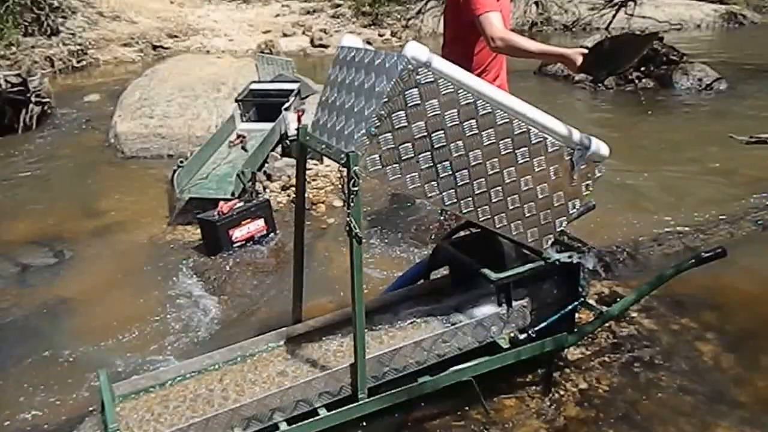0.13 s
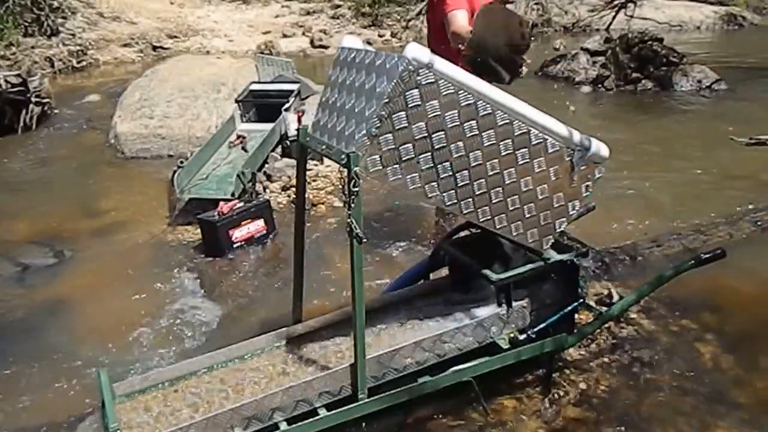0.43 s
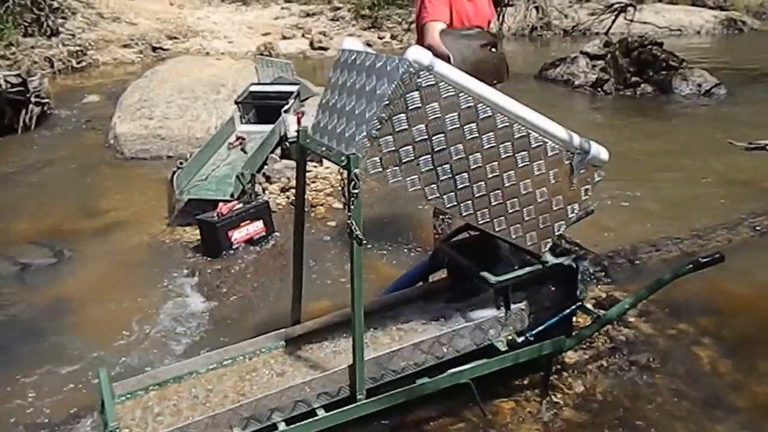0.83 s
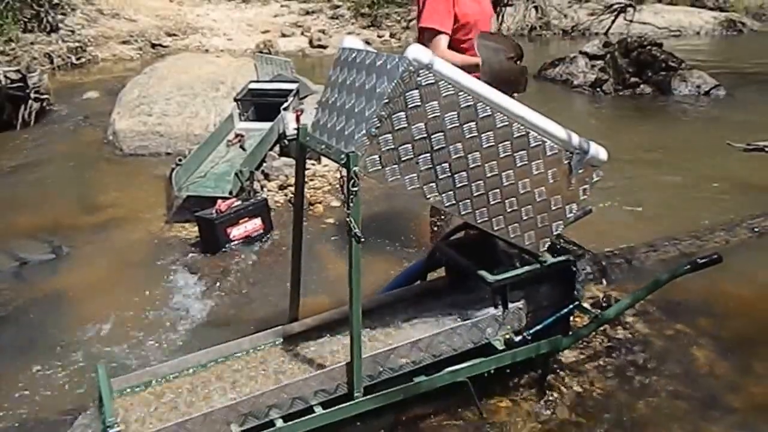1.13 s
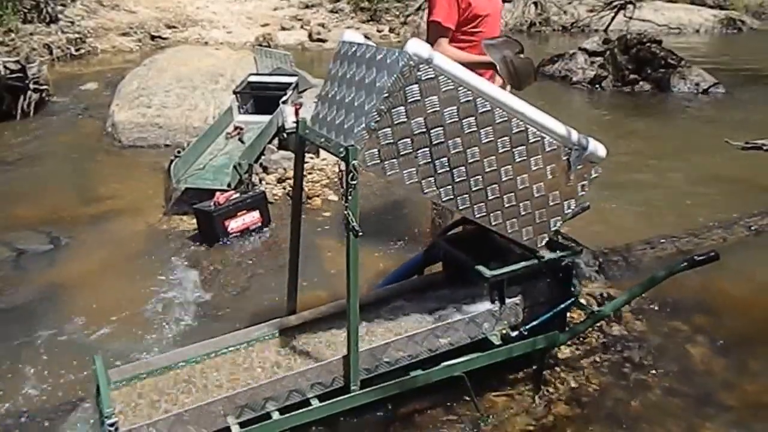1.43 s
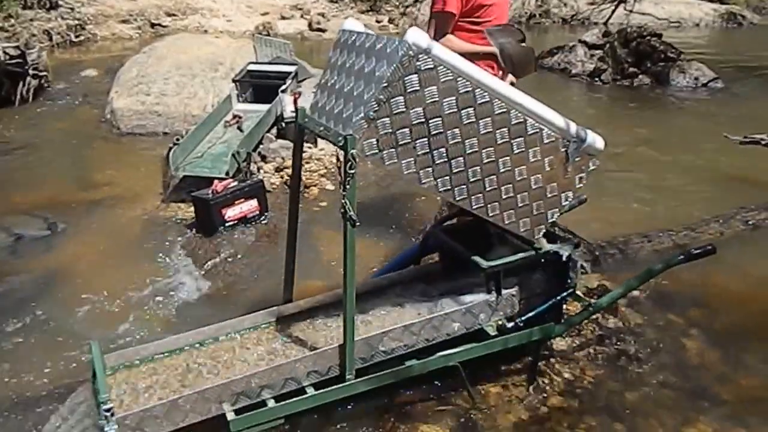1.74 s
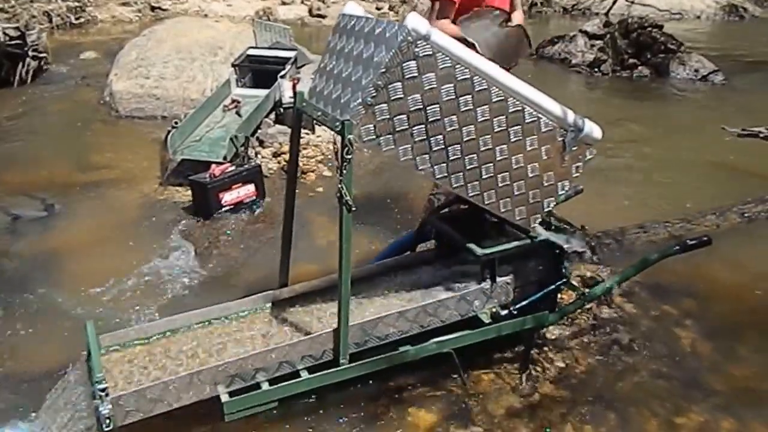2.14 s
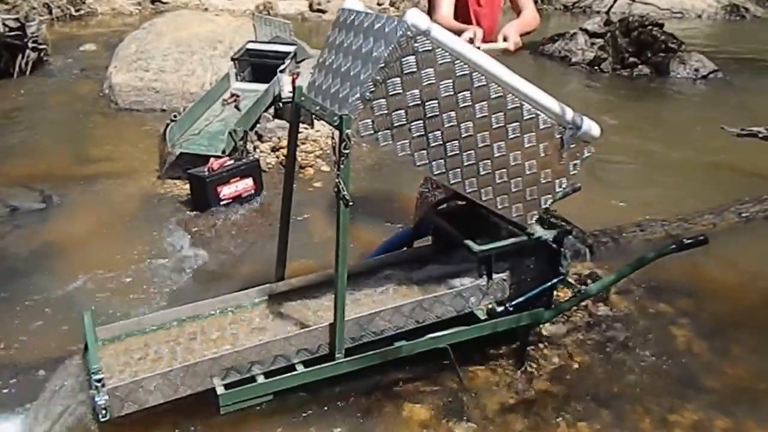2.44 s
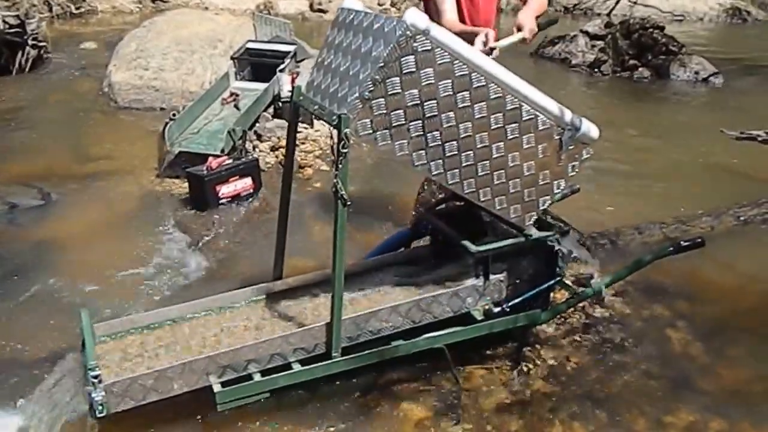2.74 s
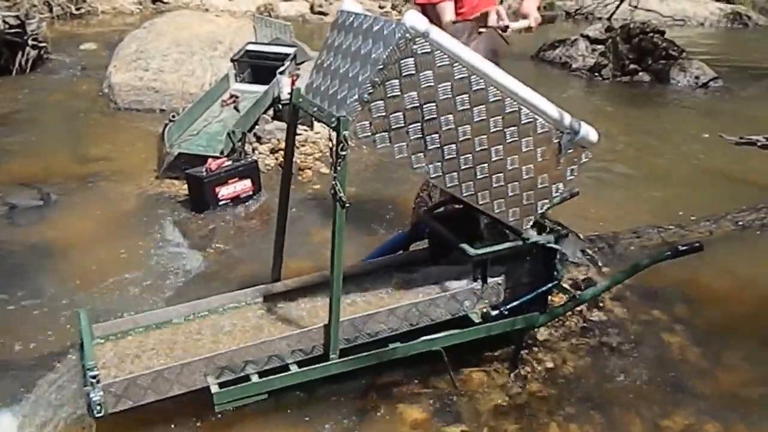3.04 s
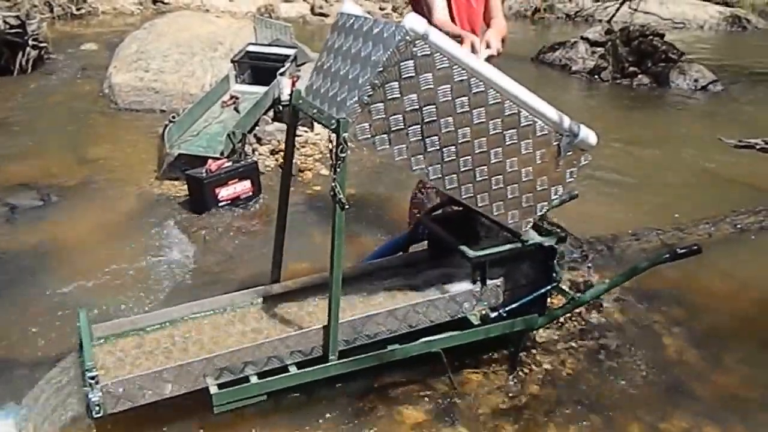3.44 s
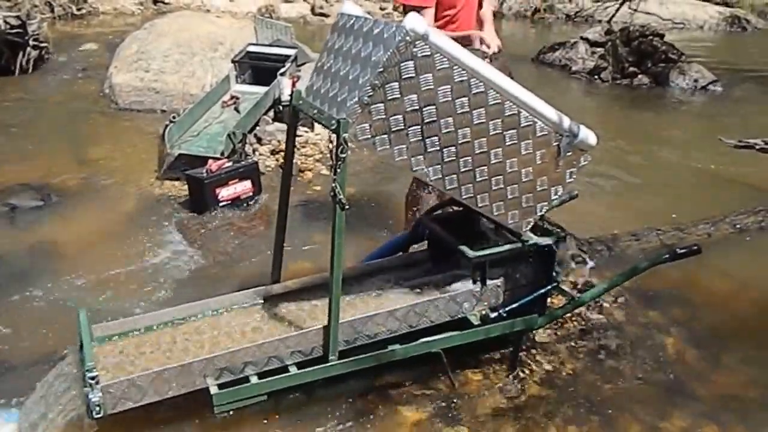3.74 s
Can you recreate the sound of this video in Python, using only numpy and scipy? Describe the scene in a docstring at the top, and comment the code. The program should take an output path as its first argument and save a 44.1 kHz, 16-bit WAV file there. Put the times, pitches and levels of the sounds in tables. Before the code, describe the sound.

Wet gravel tumbles and clatters into a metal hopper over steady rushing, bubbling water

```python
"""Wet gravel is tipped and shovelled into the metal hopper of a sluice standing in a river.
Gravel slides as a dense stream of noise grains and ringing pebbles, and drops in swelling clumps.
Single stones knock on the plate or clink together, the shovel blade scrapes and rings, water plops and gurgles.
Water rushes (coloured grains) and bubbles (decaying sines) throughout, over a pump's faint hum of three sines."""
import sys
import numpy as np
from scipy import signal
from scipy.fft import rfft, irfft, next_fast_len
from scipy.io import wavfile
from scipy.ndimage import map_coordinates

SR = 44100
rng = np.random.default_rng(int(sys.argv[2]) if len(sys.argv) > 2 else 0)


def wav_record(signal):
    """Record a signal, one row per channel, as 16-bit PCM in the file named by sys.argv[1]."""
    frames = np.transpose(np.atleast_2d(signal))
    bounded = np.clip(frames, -1, 1)
    # unit amplitude maps onto the largest positive 16-bit level
    quanta = np.round(bounded * 32767).astype(np.int16)
    wavfile.write(sys.argv[1], SR, quanta)


N = 171549  # samples

# Colour of gravel on the hopper plate. Each row: frequency in Hz, relative level in dB.
HOPPER_COLOUR = [(40, -31.5), (140, -12), (178, -33), (201, -11.5), (268, 2), (303, -7), (341, -1),
                 (489, -3), (565, -10.5), (718, 1), (957, -3), (1310, -9), (1510, -2.5), (1830, -3.5),
                 (2060, -6), (3030, -6.5), (3420, -13.5), (7190, -18.5), (8710, -13.5), (15500, -48)]
# Colour of fine wet spray and of stone cracks. Each row: frequency in Hz, relative level in dB.
SPRAY_COLOUR = [(1200, -26.5), (3000, -3.5), (5000, -1.5), (8900, -0.5), (11000, -6.5), (15500, -14)]


def amp(db):
    """Decibels to gain."""
    return 10 ** (np.asarray(db) / 20)


def unit(x):
    """Scale to rms 1."""
    return x / np.sqrt(np.mean(x ** 2) + 1e-20)


def along(points, hz):
    """Read (Hz, value) points at the frequencies hz, on a log axis."""
    f, v = np.transpose(points)
    return np.interp(np.log(hz + 1), np.log(f + 1), v)


def wobble(rate):
    """A smooth random curve with this many knots a second."""
    return map_coordinates(rng.standard_normal(4096), [np.arange(N) * rate / SR], mode="mirror")


def filtered(x, response):
    """Multiply the spectrum of x by a response of frequency."""
    m = next_fast_len(N + SR // 2)
    return irfft(rfft(x, m) * response(np.fft.rfftfreq(m, 1 / SR)), m)[..., :N]


def ring_of(spectrum, size=2048):
    """Causal (minimum-phase) impulse response with the given colour, by folding its cepstrum."""
    hz = np.fft.rfftfreq(size, 1 / SR)
    cepstrum = irfft(np.log(amp(along(spectrum, hz))))
    cepstrum[1:size // 2] *= 2
    cepstrum[size // 2 + 1:] = 0
    return irfft(np.exp(rfft(cepstrum)))


def coloured(pair, spectrum):
    """A pair of signals rung through a colour."""
    return signal.fftconvolve(pair, ring_of(spectrum)[None], axes=1)[:, :N]


def spread(pair):
    """Two signals, mid and side, become left and right with a likeness set by frequency."""
    # How alike the two channels are. Each row: frequency in Hz, left-right correlation (1 is identical).
    likeness = [(30, 0.27), (125, 0.7), (300, 0.96), (1800, 0.94), (4000, 0.73), (13000, 0.47)]
    turn = lambda hz: np.arccos(np.clip(along(likeness, hz), -1, 1)) / 2
    mid, side = filtered(pair, lambda hz: np.array([np.cos(turn(hz)), np.sin(turn(hz))]))
    return np.array([mid + side, mid - side])


def add(out, s, sound):
    """Mix a sound in at s seconds."""
    part = out[..., max(0, round(s * SR)):][..., :sound.shape[-1]]
    part += sound[..., :part.shape[-1]]


def grains(per_s, scatter_db, life_s, sand):
    """Many tiny contacts of scattered size, each a short burst of noise, over smooth sand."""
    scatter = np.clip(rng.standard_normal(N), -2, 2)
    sizes = (rng.random(N) < per_s / SR) * amp(scatter_db * scatter)
    power = signal.lfilter([1], [1, -np.exp(-2 / (life_s * SR))], sizes ** 2)
    return np.sqrt(power / power.mean() + abs(sand)) * rng.standard_normal((2, N))


def bubbles(per_s=260, centre_hz=929, cycles=7.2, rise=0.15):
    """Each bubble is a decaying sine whose pitch climbs while it is loud."""
    out, t = np.zeros((2, N)), np.arange(SR // 20) / SR
    for when, pitch, size, side in rng.random((int(per_s * N / SR), 4)):
        hz = centre_hz * 2 ** (3.2 * (pitch - .5))  # over 3.2 octaves
        age = t * hz / cycles
        phase = 2 * np.pi * hz * t * (1 + rise * np.minimum(age, 2) / 2)
        # loses 22 dB in the given number of cycles
        ring = np.sin(phase) * amp(-22 * age) * (1 - np.exp(-t * hz))
        place = [1, 3 * (side - .5)]  # mid and side
        add(out, when * N / SR, amp(18.0 * size ** 2) * np.outer(place, ring))
    return out


def water(rush_db=-29, bubble_db=-38.5):
    """The rush down the sluice: churning splashes as coloured grains of wandering level, with bubbles."""
    # Colour of the rush. Each row: frequency in Hz, relative level in dB.
    rush_colour = [(30, -37), (71, -22), (208, -0.5), (399, 0.5), (606, -8), (897, 3.5), (1050, -1),
                   (1400, -7.5), (1720, 0.5), (2020, -5), (2490, -3), (3590, -12.5), (7460, -17),
                   (15500, -21.5)]
    splashes = grains(per_s=900, scatter_db=10.5, life_s=0.0042, sand=1.8)
    rush = unit(coloured(splashes, rush_colour))
    return amp(rush_db + 2.45 * wobble(7.3)) * rush + amp(bubble_db) * unit(bubbles())


def pump():
    """A faint hum under the water: sines that waver together in pitch and separately in level."""
    # Tones of the hum. Each row: pitch in Hz, level in dB, both before wavering.
    tones = [(141, -56), (282, -51.5), (344, -47)]
    speed = 1 + 0.0154 * wobble(12)
    turns = np.cumsum(speed) / SR
    return sum(amp(db + 1.15 * wobble(6.9)) * unit(np.sin(2 * np.pi * hz * turns)) for hz, db in tones)


def rattling(bed, pebbles_per_s=620, t60_at_1khz=.016, scatter_db=2, pebble_db=-4):
    """Over a bed of grains, pebbles ring at their own pitch and place; the higher, the shorter."""
    draws = rng.random((int(pebbles_per_s * N / SR), 4))
    when, pitch, side, size = draws.T[:, :, None]
    hz, t = 250 * 48 ** pitch, np.arange(SR // 60) / SR  # 250 Hz to 12 kHz
    t60 = t60_at_1khz * np.sqrt(1000 / hz)
    strength = np.sqrt(hz / t60) * amp(-scatter_db * np.log(size + 0.035))
    rings = strength * np.sin(2 * np.pi * hz * t) * amp(-60 * t / t60) * (1 - np.exp(-t * hz))
    # sum all the rings at their own samples, once for mid and once for side
    at = ((when * N).astype(int) + np.arange(len(t))).ravel()
    pair = np.array([unit(np.bincount(at, (rings * g).ravel(), N)[:N]) for g in (1, side - .5)])
    return coloured(unit(bed) + amp(pebble_db) * pair, HOPPER_COLOUR)


def slide(dull_hz=4930, rattle_gain_db=0.5, spray_gain_db=0.5):
    """Gravel runs unevenly over the plate, its rattle muffled above dull_hz, with a fine wet spray."""
    # Course of the slide. Each row: time in seconds, rattle in dB, spray in dB, before gain and surging.
    course = [(.1, -31.5, -37), (.3, -28, -39), (.44, -21.5, -35.5), (.56, -27, -27), (.7, -28.5, -26.5),
              (.78, -32.5, -32), (1.15, -30.5, -30), (1.6, -21.5, -25.5), (1.93, -20.5, -24),
              (2.04, -23.5, -30.5), (2.23, -23.5, -27), (2.31, -30.5, -33.5), (2.46, -30.5, -31),
              (2.6, -21, -24.5), (2.66, -25.5, -29), (2.76, -16.5, -22), (2.885, -24, -29),
              (2.93, -21.5, -24.5), (3.39, -18, -23.5), (3.44, -27, -28.5), (3.5, -22, -26.5),
              (3.89, -23, -26.5)]
    s, *columns = np.transpose(course)
    surge_db = 1.03 * wobble(34.94)
    t = np.arange(N) / SR
    rattle, hiss = [amp(np.interp(t, s, db) + surge_db) for db in columns]
    pebbles = rattling(grains(per_s=380, scatter_db=2.0, life_s=0.007, sand=0.82))
    pebbles = unit(filtered(pebbles, lambda hz: 1 / np.hypot(1, (hz / dull_hz) ** 2)))
    spray = unit(coloured(grains(per_s=400, scatter_db=5.0, life_s=0.0083, sand=0.48), SPRAY_COLOUR))
    return amp(rattle_gain_db) * rattle * pebbles + amp(spray_gain_db) * hiss * spray


def clinks(rough=0.15, gain_db=-4, attack_s=0.00034):
    """Stone on stone rings for a few milliseconds, its phase jittered so that it sounds rough."""
    # Stones clinking together. Each row: start in seconds, level in dB before gain, pitch in Hz.
    strikes = [(.132, 1.5, 2680), (.581, -4, 1500), (.647, -5, 1850), (1.725, -7, 2700), (1.813, -8, 1620),
               (2.242, -9, 4100), (2.263, -7, 4380), (2.271, -3, 4580), (2.281, -5, 4280),
               (2.298, -15, 4400)]
    # Modes of a stone. Each row: ratio to the pitch, relative level in dB, 60 dB decay in seconds.
    modes = [(1, 1, 0.013), (1.15, 2.5, 0.0057), (1.38, -10, 0.01)]
    out, t = np.zeros(N), np.arange(SR // 20) / SR
    for s, db, hz in strikes:
        ring = np.zeros(len(t))
        for ratio, level, t60 in modes:
            jitter = rough * rng.standard_normal(len(t))
            phase = np.cumsum(2 * np.pi * hz * ratio / SR + jitter)
            ring += amp(level - 60 * t / t60) * np.sin(phase)
        add(out, s, amp(db + gain_db) * ring * (1 - np.exp(-t / attack_s)))
    return out


def knocks(body_t60=.03, crack_t60=0.021, crack_db=-11, gain_db=-2.0, brightening=0.53):
    """A stone gives a dead knock, a tick at its own pitches and a crack; hard contact favours the crack."""
    # Stones striking the plate. Each row: start in seconds, level in dB before gain,
    # brightness in steps (each shifts levels by "brightening" dB).
    strikes = [(0.187, -13.5, 23), (.482, -5, 17), (.581, -6, 2), (.602, -1.5, 0), (.624, -4, -4),
               (.637, -4, -3), (.648, -6, -8), (.694, -8, 12), (.734, -12, 20), (1.411, -6.5, -7),
               (1.494, -7, -3), (1.569, -4.5, 8), (1.609, -1.5, -7), (1.711, -9, -4), (1.725, -2.5, -9),
               (1.783, -0.5, -4), (1.813, -10, -3), (1.935, -5, 3), (1.957, -7, -8), (1.999, -1, -22),
               (2.384, -9.5, 15), (2.402, -7.5, 9), (2.6, -3, 9), (2.726, -7, -5), (2.798, -4, -5),
               (2.817, -7, -5), (3.607, -6.5, -7)]
    stone_hz, stone_octaves, stone_t60, stone_db = 2096, 1.6, 0.014, -9.5  # centre, spread, seconds, level
    out, t = np.zeros((2, N)), np.arange(SR // 16) / SR
    for (s, db, bright), pitches in zip(strikes, rng.random((len(strikes), 4))):
        body_db = -brightening * max(bright, 0)
        edge_db = crack_db + brightening * bright
        body = HOPPER_COLOUR, body_t60, body_db + gain_db
        crack = SPRAY_COLOUR, crack_t60, edge_db
        for colour, t60, part_db in (body, crack):
            burst = amp(-60 * t / t60) * rng.standard_normal((2, len(t)))
            hit = coloured(burst, colour)
            add(out, s, amp(db + part_db) * hit / np.abs(hit[0]).max())
        hz = stone_hz * 2 ** (stone_octaves * (pitches - .5))
        tick = np.sin(2 * np.pi * np.outer(hz, t)).sum(0) / 2
        add(out[0], s, amp(db + body_db + stone_db - 60 * t / stone_t60) * tick)  # mid only
    return out


def clumps():
    """Each clump swells and dies away: a thud of the plate, a rattle of pebbles and a spray."""
    # Clumps landing. Each row: time of the peak in seconds, rise and fall in seconds,
    # thud, rattle and spray in dB.
    landings = [(0.513, 0.006, 0.023, -22.5, -15, -26), (0.55, .004, 0.011, -19.5, -17, -35),
                (0.584, 0.0021, 0.04, -33, -14, -16), (0.615, 0.013, 0.073, -20.5, -15.5, -18),
                (1.348, 0.0046, 0.036, -29, -21, -25), (1.487, 0.014, 0.034, -26, -18, -26.5),
                (1.56, 0.021, 0.018, -22.5, -19.5, -24), (1.695, 0.009, .055, -25, -20, -30),
                (2.507, 0.013, 0.04, -14.5, -14, -19), (2.627, 0.006, 0.0085, -29, -14, -19),
                (2.728, .008, .016, -29, -16, -28), (2.797, 0.035, 0.043, -16, -13, -25),
                (2.845, 0.029, 0.02, -22, -19, -18), (3.145, .014, 0.028, -28.5, -18.5, -24),
                (3.325, 0.032, 0.035, -27, -15, -20), (3.39, 0.013, 0.019, -38, -18.5, -22),
                (3.518, .013, 0.039, -16.5, -18.5, -22), (3.722, 0.012, 0.015, -22.5, -15, -26),
                (3.831, 0.011, 0.014, -28, -15.5, -30)]
    # Colour of the plate's thud. Each row: frequency in Hz, relative level in dB.
    thud_colour = [(30, -30), (80, -13.5), (125, -4), (175, -6.5), (300, 4), (560, 2.5), (760, -0.5),
                   (1100, -6.5), (2500, -8.5), (8000, -74)]
    t, power = np.arange(N) / SR, np.zeros((3, N))
    for s, rise, fall, *levels in landings:
        shape = np.exp(-np.where(t < s, (s - t) / rise, (t - s) / fall) ** 1.46)
        power += np.outer(amp(levels), shape) ** 2
    bed = lambda: grains(per_s=1200, scatter_db=4.5, life_s=0.0026, sand=1.0)
    layers = coloured(bed(), thud_colour), rattling(bed()), coloured(bed(), SPRAY_COLOUR)
    return sum(np.sqrt(p) * unit(layer) for p, layer in zip(power, layers))


def resonance(f, hz, width_hz):
    """Response of one resonance at the frequencies f."""
    return 1j * f * width_hz / (hz * hz - f * f + 1j * f * width_hz)


def scrapes(blade_width_hz=51, grit_q=2.2):
    """The blade catches and slips on grit: a rasp that swells and fades and leaves the steel ringing."""
    # Shovel strokes. Each row: start in seconds, length in seconds, grit level in dB,
    # grit pitch in Hz, blade ring level in dB.
    strokes = [(0.506, .008, -25, 6960, -26), (0.532, 0.015, -20, 11500, -19),
               (.549, 0.015, -36, 6500, -36), (2.249, .034, -20, 4940, -49)]
    # Resonances of the blade. Each row: pitch in Hz, relative level in dB.
    blade_modes = [(6430, 1), (9700, -5), (11800, -8), (13700, -2)]
    out, t = np.zeros((2, N)), np.arange(N) / SR
    blade = lambda f: sum(amp(db) * resonance(f, mode, blade_width_hz) for mode, db in blade_modes)
    for s, length, grit_db, hz, ring_db in strokes:
        grit = lambda f: resonance(f, hz, hz / grit_q)
        u = np.clip((t - s) / length, 0, 1)
        stroke = 2 * np.sqrt(u * (1 - u))
        slips = grains(per_s=700, scatter_db=3, life_s=0.00082, sand=0.18)
        for db, body in ((grit_db, grit), (ring_db, blade)):
            # levelled by how loud endless slipping would be
            out += amp(db) * filtered(stroke * slips, body) / filtered(slips, body).std()
    return out


def plops(rough=0.027, attack_s=0.0012, sag=0.16, glide_s=0.019, t60=0.04):
    """A plop or gurgle of water: a short, rough, hollow note that sags in pitch."""
    # Plops and, from 2.98 s, gurgles. Each row: start in seconds, level in dB, pitch in Hz before it sags.
    notes = [(0.509, -7, 1235), (.525, -7.5, 945), (0.547, -5.5, 1227), (.559, -6, 885), (.587, -9, 2210),
             (.615, -8, 854), (.657, -8.5, 750), (2.983, -10.5, 786), (3.05, -11.5, 790), (3.132, -13, 750),
             (3.21, -10, 900), (3.287, -8, 1880), (3.355, -8, 1660), (3.447, -15, 1790), (3.517, -2, 773)]
    out, t = np.zeros(N), np.arange(SR // 10) / SR
    bend = 1 - sag * (1 - np.exp(-t / glide_s))
    for s, db, hz in notes:
        phase = np.cumsum(2 * np.pi * hz * bend / SR + rough * rng.standard_normal(len(t)))
        add(out, s, amp(db - 60 * t / t60) * (1 - np.exp(-t / attack_s)) * np.sin(phase))
    return out


def scene():
    """Broad sounds spread over both channels; clinks, plops and hum in one spot; all tilted left or right."""
    # Lean of the stereo image. Each row: frequency in Hz, left minus right in dB.
    balance = [(60, 5), (400, 2.1), (1400, 3.5), (4000, 1.5), (8000, 0.2), (13000, -4)]
    wide = spread(water() + slide() + clumps() + knocks() + scrapes())
    pair = wide + clinks() + plops() + pump()
    return filtered(pair, lambda hz: amp(np.outer([.5, -.5], along(balance, hz))))


def record(dry):
    """The microphone opens by 0.1 s, rounds off the highest peaks and cuts everything above 15.9 kHz."""
    opening_db = np.interp(np.arange(N) / SR, [.078, .082, .097, .1], [-120, -30, -18, 0])
    soft = dry / (1 + np.abs(dry) ** 6) ** (1 / 6)
    return filtered(amp(opening_db) * soft, lambda hz: hz < 15900)


dry = scene()
out = record(dry)
wav_record(out)
```